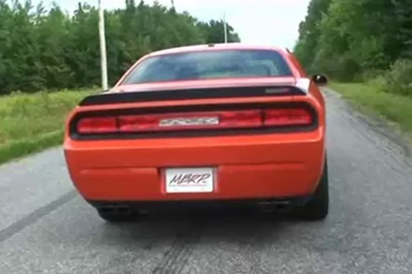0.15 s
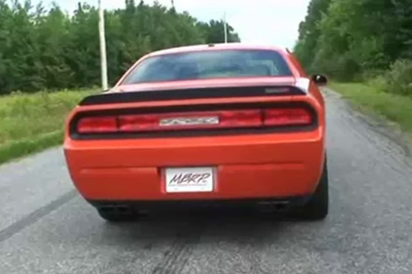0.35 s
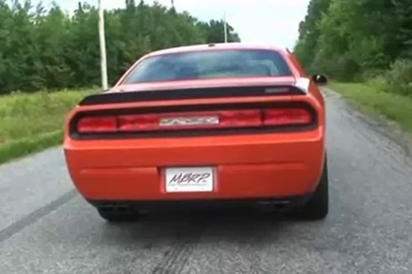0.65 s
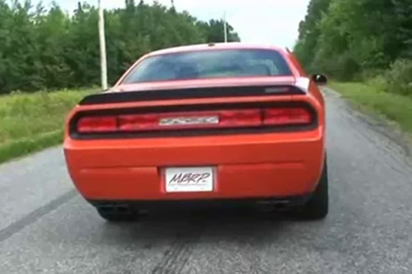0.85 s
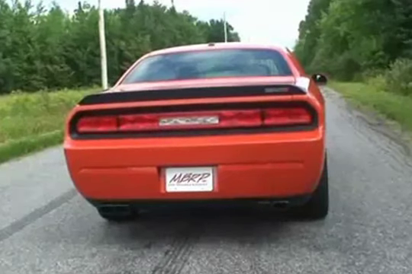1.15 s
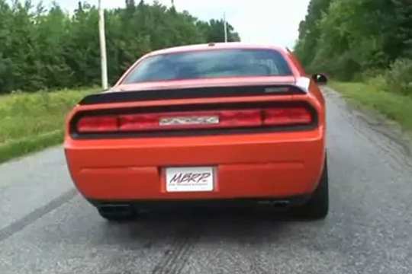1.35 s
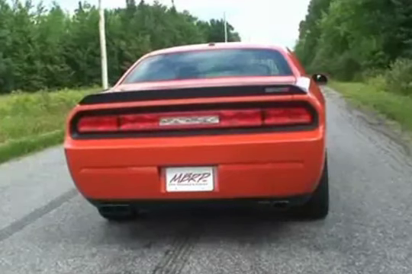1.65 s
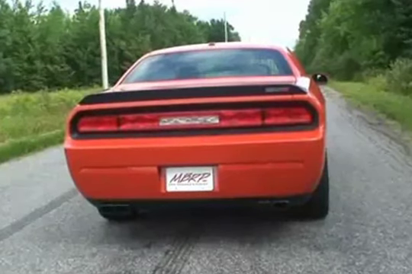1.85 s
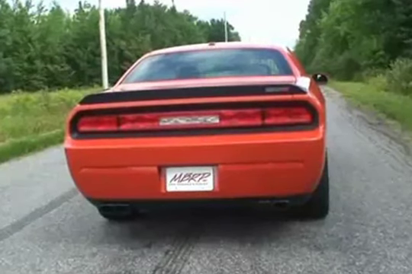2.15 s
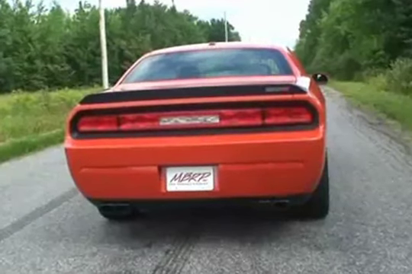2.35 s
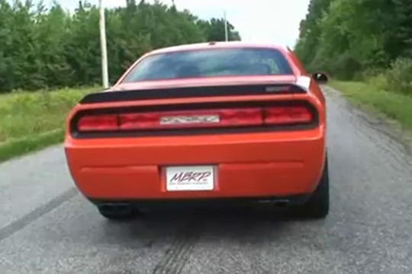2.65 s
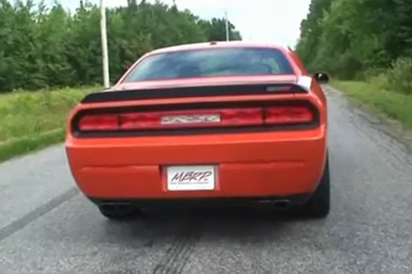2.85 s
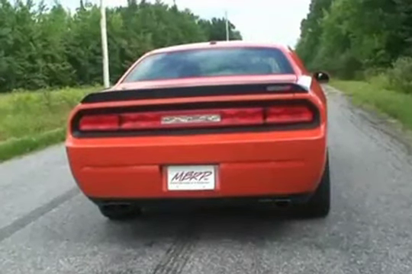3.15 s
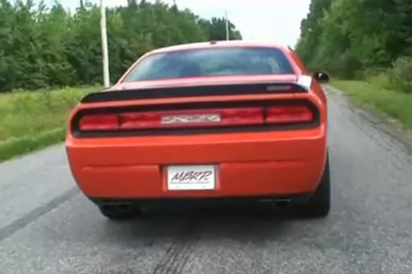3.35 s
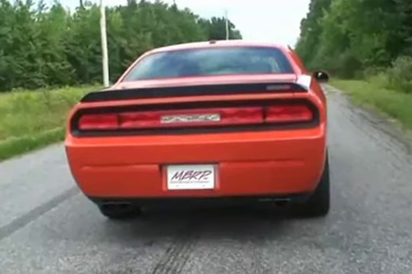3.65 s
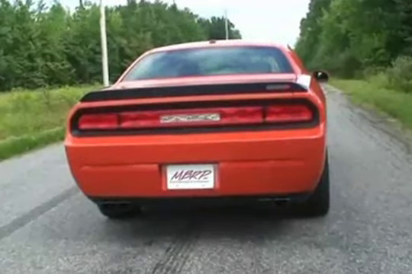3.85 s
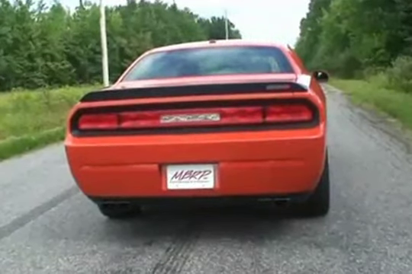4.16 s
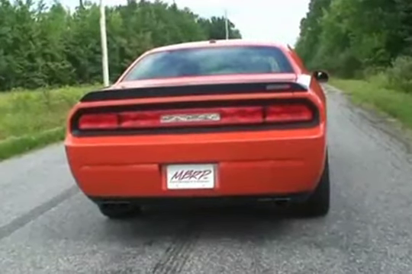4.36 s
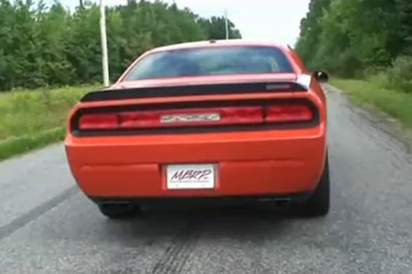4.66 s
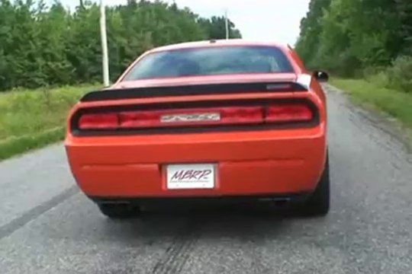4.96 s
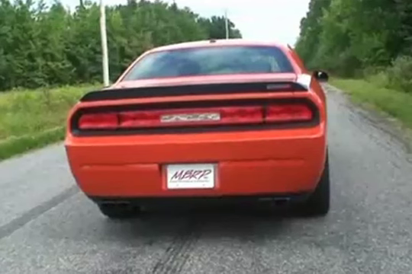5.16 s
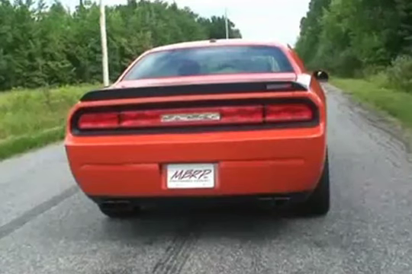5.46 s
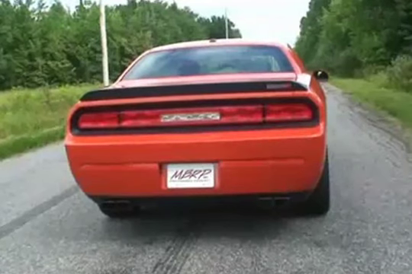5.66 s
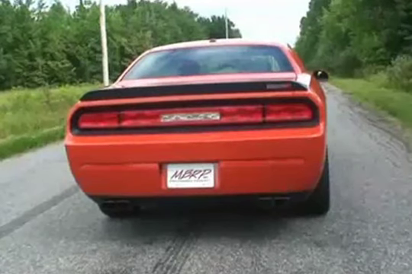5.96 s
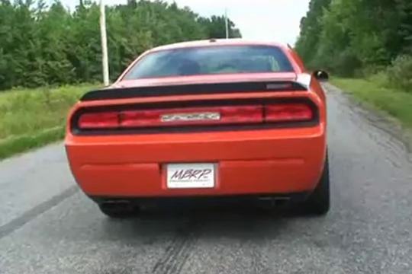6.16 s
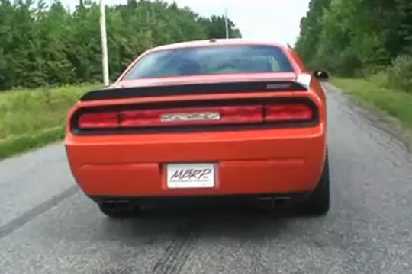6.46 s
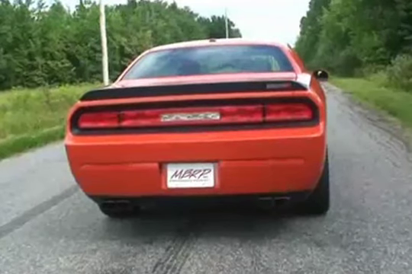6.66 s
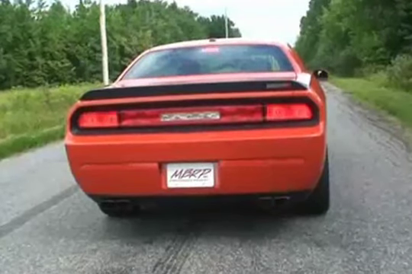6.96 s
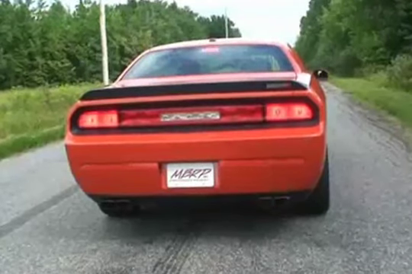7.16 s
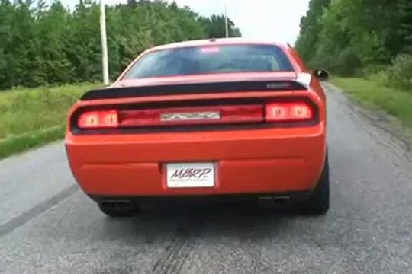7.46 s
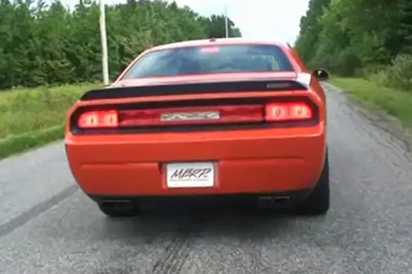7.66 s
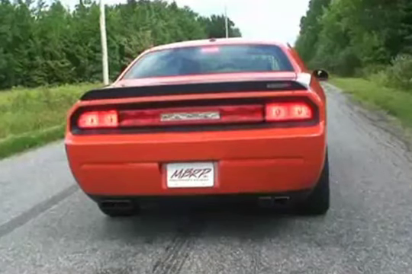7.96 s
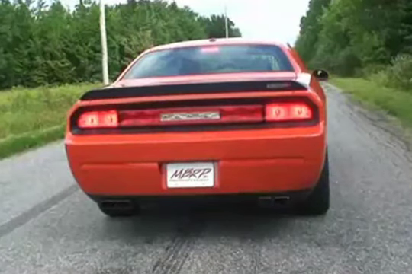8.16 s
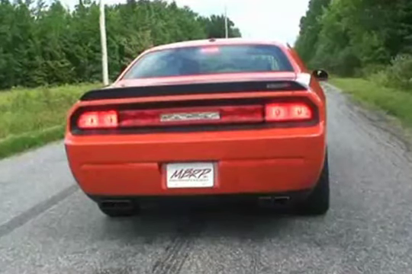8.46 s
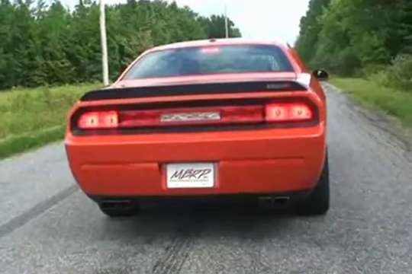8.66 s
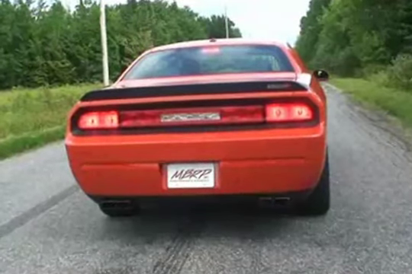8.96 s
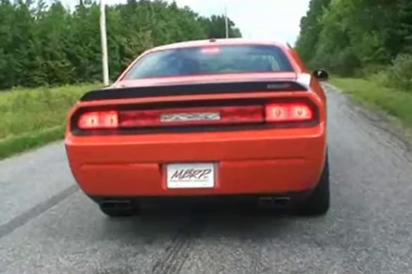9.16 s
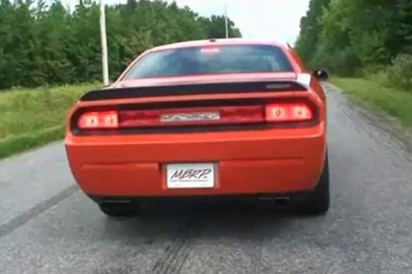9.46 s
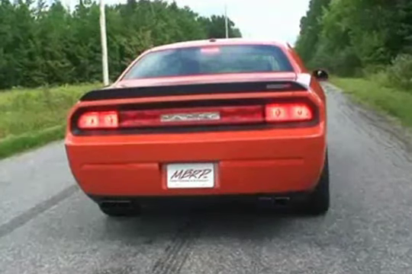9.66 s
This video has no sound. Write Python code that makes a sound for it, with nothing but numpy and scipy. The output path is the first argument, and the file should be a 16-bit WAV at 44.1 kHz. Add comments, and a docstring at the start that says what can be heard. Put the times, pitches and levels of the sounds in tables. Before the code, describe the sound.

A big petrol V8 with a loud exhaust, heard in stereo just behind the tailpipes of a standing car on an open country road. It starts mid-rev, peaks around 0.3 s and falls by 1 s, with sharp little pops from 0.45 to 0.75 s. A second, longer rev climbs from 1.2 s to about 1.9 s, then drops with a few crackles near 2.1 to 2.5 s. At 2.85 s the throttle is stabbed hard: pitch leaps to a raspy, barking roar peaking at 3.3 s, the loudest moment. It slides down until 5.2 s, hissing and popping around 4.6 to 5.3 s. Thin wavering whines show from 5.3 to 6 s, with last pops at 6.1 to 6.3 s. From 6.5 s to the end near 9.8 s it idles low, uneven and loping, much quieter, with soft gassy hiss, faint dull echo and slightly heavier bass on the right.

```python
"""On an open country road stands a big petrol V8, heard from just behind its tailpipes.
It is revved three times, the last time hard, coasts down with pops and thin whines and settles to a loping idle.
Eight uneven blows per engine cycle boom and burble through the exhaust, built from repeating harmonics.
Shaped noise and fine ripples, locked to the same blows, make the rasp and hiss of the escaping gas.
Short noise bursts are the pops; a faint echo and a faint airy hiss surround the car."""
import sys
import numpy as np
from scipy import signal
from scipy.fft import rfft, irfft
from scipy.io import wavfile
from scipy.ndimage import uniform_filter1d

SR = 44100
rng = np.random.default_rng(int(sys.argv[2]) if len(sys.argv) > 2 else 0)


def put_to_file(sound):
    """Save the sound as 16-bit audio at rate SR, in the file named by the first command-line argument."""
    columns = np.atleast_2d(sound).T  # one column per channel
    safe = np.clip(columns, -1, 1)
    whole_steps = np.round(safe * 32767)
    wavfile.write(sys.argv[1], SR, whole_steps.astype(np.int16))


N = 432180

# Harmonics of the burble, counted per engine cycle (two turns); the firing note would be number 8.
# Each row: harmonic number, relative level at idle in dB, relative level when revved in dB.
BURBLE_HARMONICS = [(3, -2, 0), (4, 9, 3), (5, -8, 3), (6, 7, 1.5), (7, -5, -1.5), (9, -12, 3),
                    (10, 4.5, -0.5), (11, -26, 6.5), (12, -3, 4), (13, -12, 9.5), (14, -7, 9.5),
                    (15, -33, 0.5), (16, 15, 8), (17, -3, 8), (18, 4, -9), (19, -7, 7.5), (20, -12.5, 3.5),
                    (21, 7.5, 5.5), (22, 3.5, 1.5), (23, -1.5, 10.5), (24, 8.5, 3), (25, 2.5, 2.5),
                    (26, 0, -7), (27, -20, -3.5), (28, -6, 3.5), (29, 2, -7), (30, -34.5, 4),
                    (31, -2.5, -1), (32, -3.5, -2.5), (33, 2, 5.5), (34, -7.5, -13.5), (35, -11.5, 4.5),
                    (36, -5, -8.5), (37, -20, 1.5), (38, -2, -7), (39, -28.5, -2), (40, -20, 5),
                    (41, -3, -3), (42, -38, -10), (43, -10, -15), (44, -13, -6.5), (45, -11, -21),
                    (46, -4.5, 4.5), (47, -7, -10.5), (48, -2.5, -14)]
IDLE_HZ, REVVED_HZ = 55, 103.6  # firing rates between which the idle sound turns into the revved sound


def undb(db):
    """Turn decibels into a gain."""
    return 10 ** (np.asarray(db) / 20)


def curves(table):
    """Draw straight lines between the rows of a timed table: one value per sample for each column."""
    seconds, *columns = np.transpose(table)
    return [np.interp(np.arange(N) / SR, seconds, column) for column in columns]


def colour(x, points):
    """Filter to the (Hz, dB) points without sounding ahead of time: a minimum-phase response."""
    size = 8192
    hz, db = np.transpose(points)
    bin_hz = np.arange(size // 2 + 1) * SR / size
    gain = undb(np.interp(np.log(bin_hz + 1), np.log(hz), db))
    # folding the cepstrum forward in time gives the minimum-phase filter
    cepstrum = irfft(np.log(gain))
    cepstrum[1:size // 2] *= 2
    cepstrum[size // 2 + 1:] = 0
    response = irfft(np.exp(rfft(cepstrum)))
    return signal.fftconvolve(x, response)[:N]


def steady(x, cycle):
    """Even out the power (unit rms) over each engine cycle, keeping the lope within it."""
    energy = np.cumsum(x * x)
    first = np.clip(np.searchsorted(cycle, cycle - .5), 0, N - 1)
    last = np.clip(np.searchsorted(cycle, cycle + .5), 0, N - 1)
    power = (energy[last] - energy[first]) / np.maximum(last - first, 1)
    return x / np.sqrt(power + 1e-18)


def per_firing(count):
    """A new random value at each whole count of firings or cycles, joined by straight lines."""
    return np.interp(count, np.arange(2048), rng.standard_normal(2048))


def gate(start, length, attack, release):
    """Rises to 1 by the start, holds for the length, then falls."""
    corners = [start - attack, start, start + length, start + length + release]
    return np.interp(np.arange(N) / SR, corners, [0, 1, 1, 0])


def bell(crest, width):
    """A smooth hump that reaches 1 at its crest."""
    return np.exp(-((np.arange(N) / SR - crest) / width) ** 2)


def strengths(hz):
    """Boom, burble, rasp and hiss in dB: speed sets them, fuel lifts them, timed swells and dips are added."""
    # Loudness against speed with the throttle shut; the pipes start to boom near 100 Hz.
    # Each row: firing rate in Hz, boom in dB, burble in dB, rasp in dB, gas hiss in dB.
    coasting = [(53, -40.5, -30.5, -47.5, -48), (68.5, -39, -28, -43.5, -46),
                (84.4, -33.5, -29, -42.5, -49.5), (87.7, -25, -22, -40.5, -43.5),
                (106, -15, -19, -34.5, -43.5), (135.7, -13, -19, -29, -43), (173, -14.5, -17, -25.5, -38.5),
                (273, -14.5, -13.5, -22.5, -41.5)]
    # Times when the engine is given fuel, by the pedal or to hold its idle.
    # Each row: start in seconds, length in seconds, burble from fuel in dB, sag in dB per second.
    pushes = [(-0.05, 0.33, -8.5, 24), (0.48, 0.35, -17.5, -7), (0.906, 0.23, -25.5, -16),
              (1.198, 0.64, -12, 13), (2.873, 0.38, -15.5, 21), (6.075, 0.062, -23.5, 0),
              (6.85, 1.55, -27.5, -1.7), (8.464, 1.396, -19, 2)]
    # Passing rises and falls of hiss, rasp and burble.
    # Each row: crest in seconds, half width in seconds, added hiss in dB, added rasp in dB, added burble in dB.
    passing_changes = [(0.249, 0.26, 2.5, 4, -0.5), (0.52, 0.08, 4, -1.5, 0.5), (0.7, 0.081, 6, 1.5, 0.5),
                       (1.39, 0.12, 2, 5, 1), (1.94, 0.09, 5, 2, 0.5), (2.22, 0.28, 6, 3, 2.5),
                       (2.902, 0.034, 8, 5.5, 2), (3.12, 0.15, 7, 7, -1), (4.24, 0.11, 5, 1.5, 3.5),
                       (4.44, 0.1, 7.5, 0.5, 2), (4.7, 0.18, 4, -0.5, -0.5), (5.28, 0.061, -2, -5, 2),
                       (9.55, 0.33, 1.5, -0.5, -1.5)]
    # Brief dips of the firing note. Each row: time in seconds, depth in dB.
    dips = [(0.35, 1.5), (2.8, 1.5), (3.29, 12), (4.18, 5.5)]
    push_attack_s, push_release_s = 0.1, 0.11
    dip_width_s, dip_burble_share = 0.035, 0.49
    boom_follows, rasp_follows, gas_follows = 0.69, 0.6, 0.16  # dB for each dB that fuel adds to the burble
    clean_burn_db = 1  # at speed a fuelled engine hisses less than a coasting one

    t = np.arange(N) / SR
    speeds, *columns = np.transpose(coasting)
    boom_db, burble_db, rasp_db, gas_db = (np.interp(hz, speeds, column) for column in columns)
    at_speed = np.interp(hz, [IDLE_HZ, REVVED_HZ], [0, 1])
    fuel_power = 0
    for start, length, db, sag in pushes:
        pedal = gate(start, length, push_attack_s, push_release_s)
        sagging_db = db - sag * np.clip(t - start, 0, length)
        fuel_power = fuel_power + (pedal * undb(sagging_db)) ** 2
        gas_db = gas_db - clean_burn_db * pedal * at_speed
    lift_db = 10 * np.log10(1 + fuel_power / undb(burble_db) ** 2)
    gas_change, rasp_change, burble_change = sum(
        np.outer(added, bell(crest, width)) for crest, width, *added in passing_changes)
    dip_db = sum(depth * bell(crest, dip_width_s) for crest, depth in dips)
    return (boom_db + boom_follows * lift_db - dip_db,
            burble_db + lift_db + burble_change - dip_burble_share * dip_db,
            rasp_db + rasp_follows * lift_db + rasp_change,
            gas_db + gas_follows * lift_db + gas_change)


def burble(cycle, strength_db, blow_db):
    """One engine cycle, repeated: the uneven blows set where its harmonics crest."""
    size = 4096
    order = np.rint(np.array(BURBLE_HARMONICS)[:, 0]).astype(int)
    phase = np.angle(np.fft.fft(undb(blow_db))[order % 8])
    lines = np.zeros(size // 2 + 1, complex)
    lines[order] = undb(strength_db) * np.exp(1j * phase)
    wave = irfft(lines)
    return np.interp(cycle % 1, np.arange(size) / size, wave / wave.std())


def puffs(firing, blow_db, scatter_db, depth):
    """Turbulence that swells with each firing; its size varies from blow to blow."""
    k = np.arange(2048)
    size_db = np.interp(firing, k, blow_db[k % len(blow_db)]) + scatter_db * per_firing(firing)
    swell = 1 + depth * np.cos(2 * np.pi * firing)
    return undb(size_db) * swell * rng.standard_normal(N)


def ripple(cycle, count=150):
    """Fine pressure ripples in the pipes that come back alike in every engine cycle."""
    size = 4096
    lines = np.zeros(size // 2 + 1, complex)
    # every harmonic above the firing note and below the count, each with a random phase
    lines[9:count] = np.exp(2j * np.pi * rng.random(count - 9))
    lines[::8] *= 1.8  # multiples of the firing note stand out
    return np.interp(cycle % 1, np.arange(size) / size, irfft(lines))


def tips(x):
    """Gas noise leaving the tailpipes, whose steel tips ring along at their own pitches."""
    # Colour of the escaping gas. Each row: frequency in Hz, level in dB.
    gas_colour = [(300, -20.5), (800, 3.5), (950, -2), (1220, -1.5), (1500, 0.5), (1900, -2), (2550, -7.5),
                  (3400, -10), (3950, -12.5), (4900, -11), (8500, -20), (10500, -26.5), (12500, -31.5)]
    # Ringing of the steel tips. Each row: frequency in Hz, width in Hz, level in dB.
    tip_modes = [(877, 14, 0.5), (1042, 10, 2), (1492, 4, 1.5), (1874, 110, -4.5), (3430, 25, -1)]
    gas = colour(x, gas_colour)
    ringing = 0
    for hz, width, db in tip_modes:
        b, a = signal.iirpeak(hz, hz / width, fs=SR)
        ringing = ringing + undb(db) * signal.lfilter(b, a, gas)
    return gas + ringing


def spits(hz, share=.55, scatter_db=6.0, decay_s=0.0037):
    """Small random bursts, more of them at speed, that ring the tips around 2 kHz."""
    happens = rng.random(N) < share * hz / SR  # share: bursts per firing, on average
    strikes = happens * undb(scatter_db * np.clip(rng.standard_normal(N), -2, 1.5))
    envelope = signal.lfilter([1], [1, -np.exp(-1 / (decay_s * SR))], strikes)
    noise = tips(envelope / np.sqrt(hz) * rng.standard_normal(N))
    x = colour(noise, [(700, -8.0), (1100, 3.5), (2000, 6.5), (3000, -1.5), (9000, 0.5)])
    return x / x.std()


def exhaust(hz, idle_jitter=0.011, revved_jitter=0.047, idle_scatter_db=2.0, revved_scatter_db=0.14,
            idle_rough_db=-19, revved_rough_db=-11, rasp_rough_db=-2, spit_db=-6, load_db=2, bark_db=-3):
    """Firing note, burble, rasp and hiss, all paced by the turning crankshaft."""
    # The cylinders' blows in firing order. Each row: relative blow at idle in dB, when revved in dB.
    cylinders = [(1.0, -0.5), (1.0, -0.5), (0.5, 1.5), (2.0, 1.5), (-12.5, -3), (3.0, 2), (-0.5, -0.5),
                 (2.0, 1.5)]
    # Response of pipes and mufflers. Each row: frequency in Hz, level in dB.
    pipe_colour = [(22, -43.5), (50, -11.5), (80, -12), (112, -1), (135, 0), (158, 2.5), (190, -5),
                   (250, -1.5), (320, -6.5), (420, -18.5), (520, -23), (660, -34), (800, -43), (1100, -46),
                   (2500, -57)]
    # Colour of the rasp in the tips. Each row: frequency in Hz, level in dB.
    rasp_colour = [(150, -45.5), (300, 3), (400, 4), (520, -5), (650, -1.5), (760, -17), (950, -29.5),
                   (2000, -56.5)]
    bark_colour = [(700, -34), (1120, 8.5), (1800, -4.5), (4000, -21.0)]  # Hz, dB
    boom_db, burble_db, rasp_db, gas_db = strengths(hz)
    revved = np.clip((hz - IDLE_HZ) / (REVVED_HZ - IDLE_HZ), 0, 1)

    def blend(idle, fast):
        """Pass from the idle value to the revved one with speed."""
        return idle + revved * (fast - idle)

    # an open throttle speeds the engine up, so rising speed stands for load
    load = uniform_filter1d(np.clip(np.gradient(hz) * SR / 450, 0, 1), size=2000)
    firing = np.cumsum(hz) / SR
    cycle = firing / len(cylinders)
    _, idle_db, revved_db = np.transpose(BURBLE_HARMONICS)
    idle_blows, revved_blows = np.transpose(cylinders)

    # no two burns are alike: timing strays most at speed off load, strength varies most at idle
    jitter = blend(idle_jitter, revved_jitter * hz / 200) * (1 - .5 * load)  # in firing intervals
    uneven = (firing + jitter * (per_firing(firing) + per_firing(cycle))) / len(cylinders)
    force = undb(blend(idle_scatter_db, revved_scatter_db) * per_firing(firing))
    idle_burble = burble(uneven, idle_db, idle_blows)
    revved_burble = burble(uneven, revved_db, revved_blows)
    blows = force * blend(idle_burble, revved_burble)
    churn = colour(puffs(firing, revved_blows, scatter_db=-2.5, depth=0.26), pipe_colour)
    roughness = undb(blend(idle_rough_db, revved_rough_db)) * steady(churn, cycle)
    body = steady(colour(blows, pipe_colour), cycle) + roughness
    firing_note = force * np.cos(2 * np.pi * len(cylinders) * uneven)
    boom = steady(colour(firing_note, pipe_colour), cycle)

    # the rasp is part repeating ripple, part fresh turbulence
    rasp = steady(colour(force * ripple(uneven), rasp_colour), cycle)
    rasp_puffs = puffs(firing, revved_blows, scatter_db=3.0, depth=0.073)
    rasp += undb(rasp_rough_db) * steady(colour(rasp_puffs, rasp_colour), cycle)

    # under load the hiss hardens into spitting
    gas_puffs = puffs(firing, 0.47 * revved_blows, scatter_db=blend(1.5, 1.4), depth=0.15)
    gas = undb(-load_db * load) * steady(tips(gas_puffs), cycle)
    gas += undb(spit_db + load_db * load) * spits(hz)
    # as load grows the pressure fronts steepen into a bark near 1 kHz
    gas += undb(bark_db) * load * steady(colour(ripple(uneven), bark_colour), cycle)
    return -boom * undb(boom_db) - body * undb(burble_db) + rasp * undb(rasp_db) + gas * undb(gas_db)


def roadside(x, t60=0.69, echo_db=-24):
    """Road and trees scatter a faint, dull echo, different on each side; it fades 60 dB in t60 seconds."""
    t = np.arange(int(SR * .5)) / SR
    tail = rng.standard_normal((2, len(t))) * undb(-60 * t / t60) * (1 - np.exp(-t / 0.023))
    tail /= np.sqrt((tail ** 2).sum(axis=1, keepdims=True))
    dull = colour(x, [(100, -0.5), (600, 7.5), (1500, -2), (6000, -1.5)])
    return undb(echo_db) * signal.fftconvolve(dull[None], tail, axes=1)[:, :N]


def airy_hiss():
    """Faint steady noise, separate on each side."""
    points = [(30, -54.5), (300, -61.0), (3000, -71.0), (8500, -63), (12000, -62.0)]  # Hz, dB
    return np.array([colour(rng.standard_normal(N), points) for _ in range(2)])


def pops(decay_s=0.0055, rise_s=0.00031, gain_db=-4.0):
    """Unburnt fuel lights in the hot pipe: short cracks that ring the tips."""
    # Each row: start in seconds, level in dB ahead of the common gain.
    pop_times = [(0.457, -26), (0.5245, -29), (0.617, -41), (0.6489, -24.5), (0.695, -23.5), (0.742, -23),
                 (2.11, -35), (2.167, -25), (2.4515, -31), (2.8714, -43), (4.622, -28), (4.677, -31),
                 (4.736, -41), (4.858, -30), (5.216, -29), (5.2646, -31), (6.073, -29.5), (6.1339, -28),
                 (6.156, -29.5), (6.2684, -34)]
    t = np.arange(int(SR / 20)) / SR
    shape = np.exp(-t / decay_s) * (1 - np.exp(-t / rise_s))
    envelope = np.zeros(N + len(t))
    for seconds, db in pop_times:
        start = int(seconds * SR)
        envelope[start:start + len(t)] += undb(db + gain_db) * shape / shape.max()
    crack = colour(tips(rng.standard_normal(N)), [(1300, -4.5), (1900, 5.5), (2800, 0)])
    return envelope[:N] * crack / crack.std()


def whines(hz, waver=0.0063):
    """Thin, slightly wavering tones of the turning engine that stand out while it coasts without fuel."""
    # Each row: multiple of the firing rate, rms level in dB.
    whine_tones = [(3.75, -35.5), (4.74, -47), (10.3, -57.5), (18.5, -55.5)]
    # When the whines start to rise, are full, start to fall and are gone, in seconds.
    coast_s = (5.251, 5.45, 5.848, 6.1)
    firing = np.cumsum(hz) / SR
    coasting = np.interp(np.arange(N) / SR, coast_s, [0, 1, 1, 0])
    tones = 0
    for multiple, db in whine_tones:
        turns = np.cumsum(hz * (1 + waver * per_firing(firing))) / SR
        tones = tones + undb(db) * np.sin(2 * np.pi * multiple * turns)
    return np.sqrt(2) * coasting * tones


def scene():
    """The car, a little louder on the right, mostly in the bass, with its echo and a faint airy hiss."""
    # Engine speed through each rev and the idle. Each row: time in seconds, firing rate in Hz.
    first_rev = [(0.0, 88.4), (0.12, 105.9), (0.33, 117.3), (0.55, 100.6), (0.71, 82.9), (0.97, 65)]
    second_rev = [(1.15, 69.5), (1.49, 113.4), (1.7, 140.9), (1.9, 156.4), (2.09, 144.8), (2.42, 117.4)]
    hard_rev = [(2.83, 88.35), (2.9, 102.3), (3.0, 143), (3.2, 252.8), (3.28, 265.4), (3.76, 215.7),
                (4.07, 192.9), (4.44, 156), (5.07, 109.9)]
    settling = [(5.36, 85.57), (5.9, 84.13), (6.22, 60.92), (6.52, 53.83), (7.1, 52.26), (7.76, 49.35),
                (8.0, 50.74), (8.25, 47.5), (8.52, 52.75), (8.97, 52.33), (9.8, 48.72)]
    hz, = curves(first_rev + second_rev + hard_rev + settling)
    car = exhaust(hz) + pops() + whines(hz)
    left = colour(car, [(100, -0.64), (600, -0.61), (1300, -0.73), (8000, -0.18)])
    right = colour(car, [(100, 0.91), (600, 0.63), (1300, 0.0), (8000, 0.17)])
    return np.array([left, right]) + roadside(car) + airy_hiss()


def record(dry, ceiling=0.98, top_hz=12500):
    """Round the tallest peaks softly and cut the treble above top_hz."""
    rounded = dry / (1 + (dry / ceiling) ** 6) ** (1 / 6)
    low_pass = signal.ellip(8, .2, 70, top_hz, fs=SR, output="sos")
    return signal.sosfilt(low_pass, rounded)


dry = scene()
out = record(dry)
put_to_file(out)
```